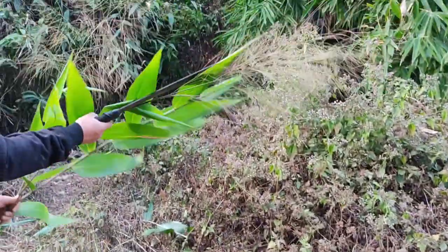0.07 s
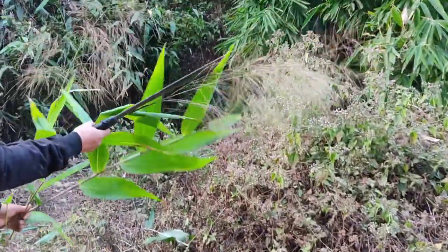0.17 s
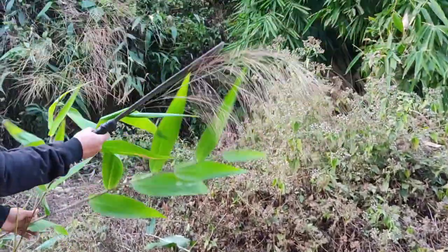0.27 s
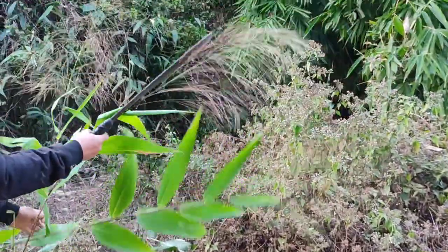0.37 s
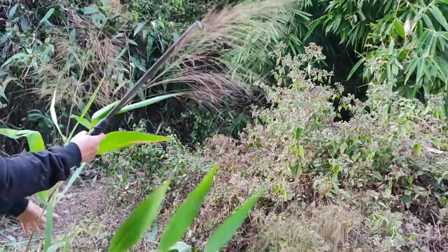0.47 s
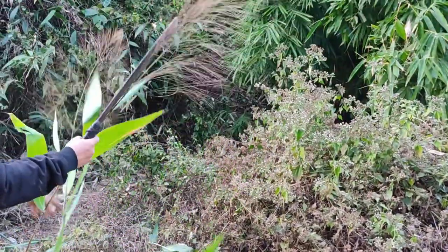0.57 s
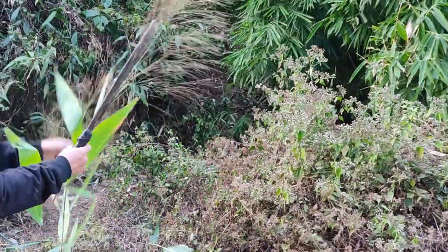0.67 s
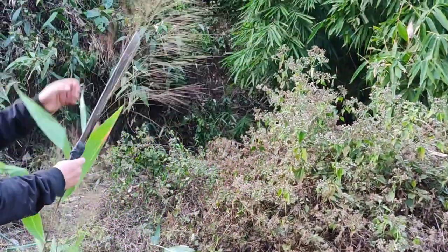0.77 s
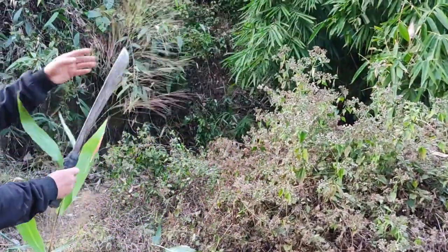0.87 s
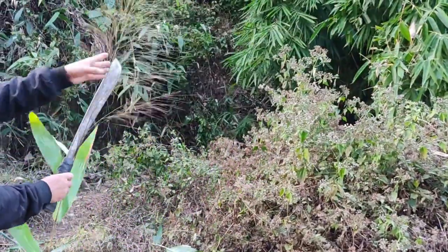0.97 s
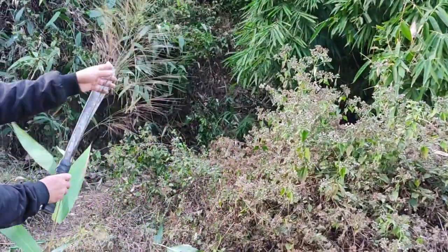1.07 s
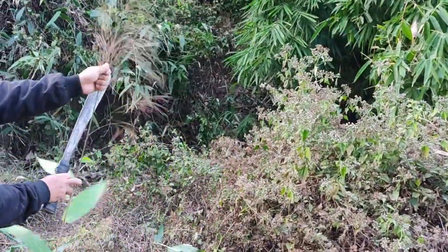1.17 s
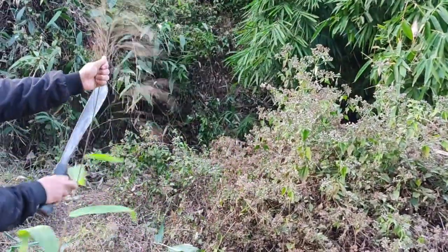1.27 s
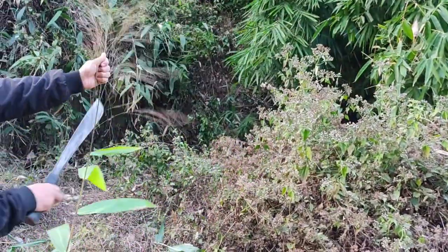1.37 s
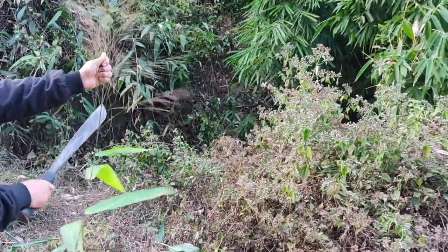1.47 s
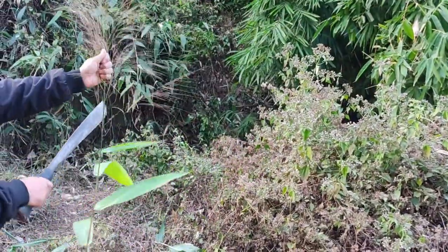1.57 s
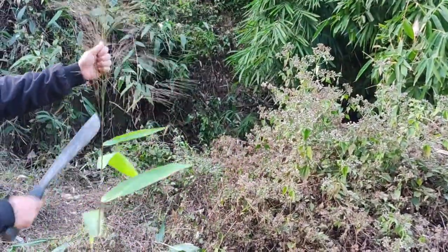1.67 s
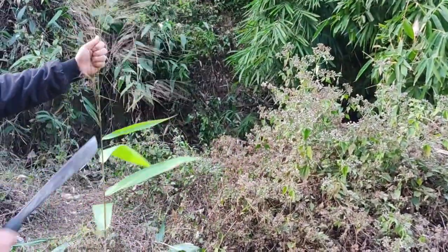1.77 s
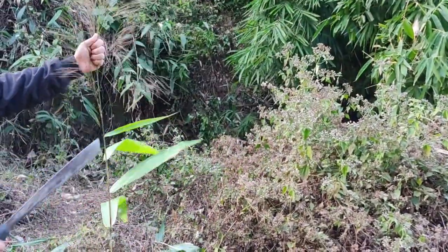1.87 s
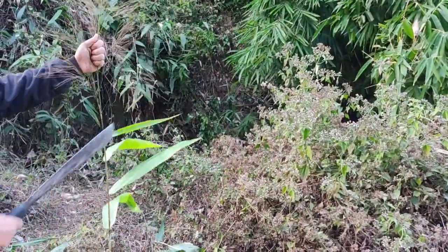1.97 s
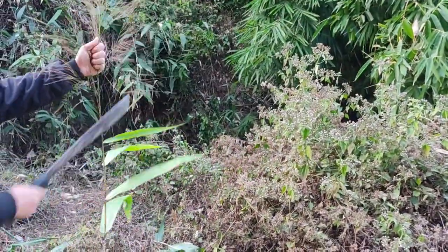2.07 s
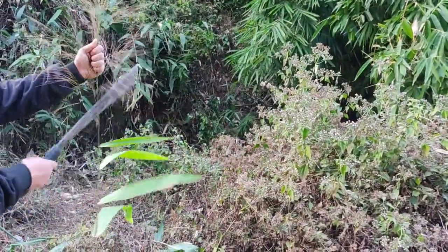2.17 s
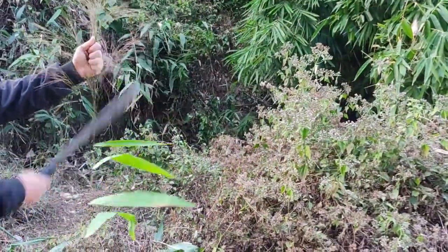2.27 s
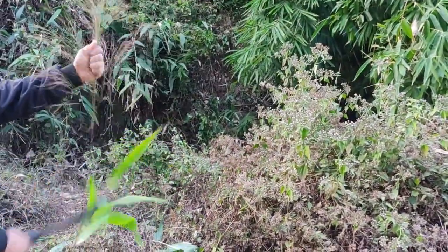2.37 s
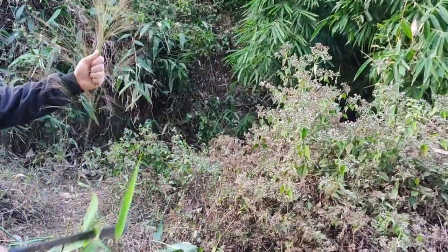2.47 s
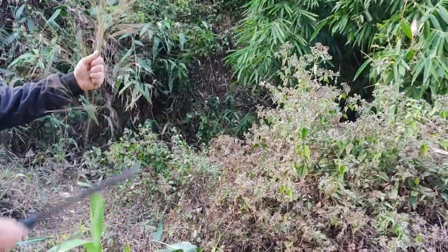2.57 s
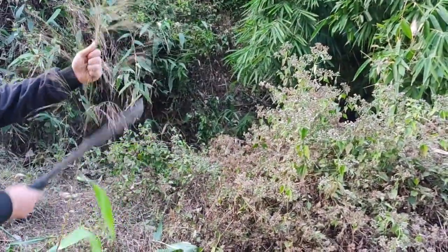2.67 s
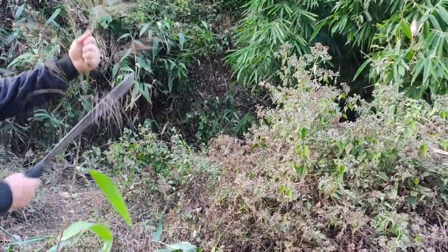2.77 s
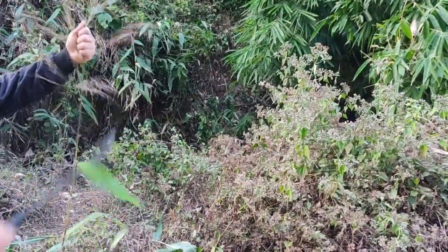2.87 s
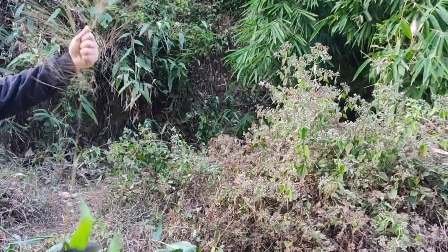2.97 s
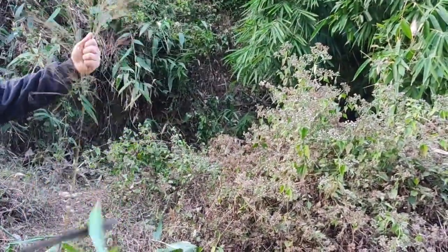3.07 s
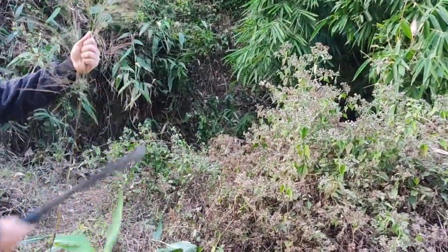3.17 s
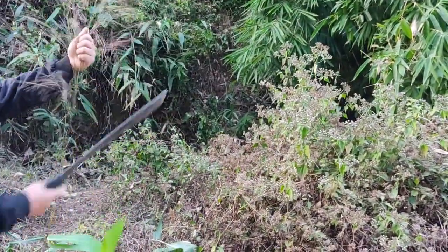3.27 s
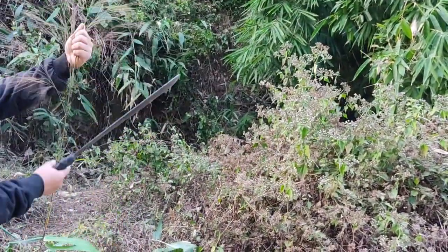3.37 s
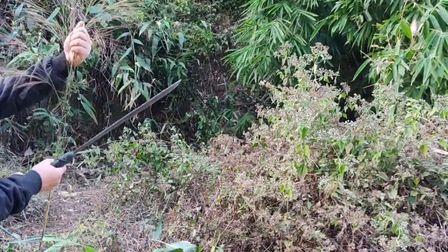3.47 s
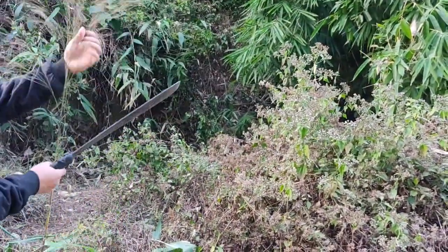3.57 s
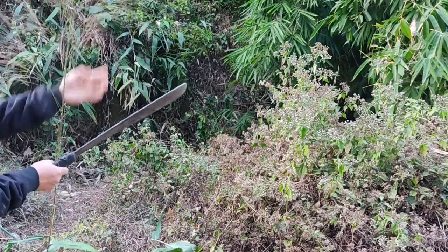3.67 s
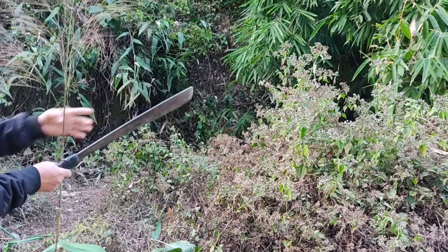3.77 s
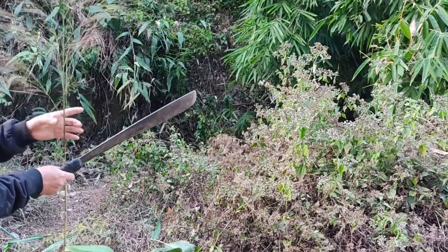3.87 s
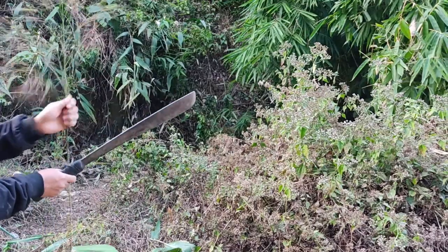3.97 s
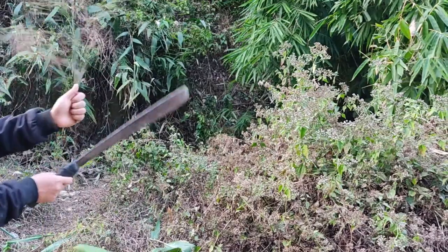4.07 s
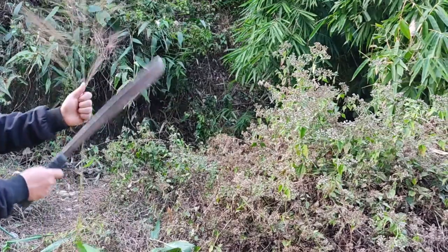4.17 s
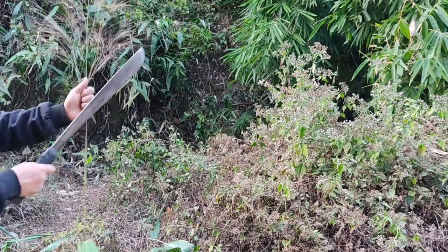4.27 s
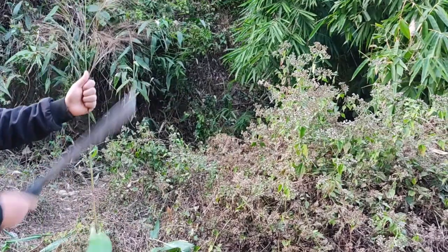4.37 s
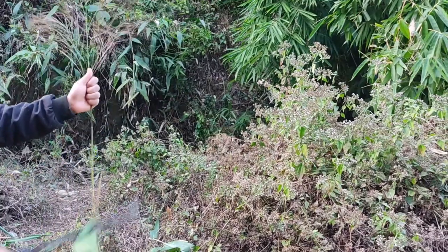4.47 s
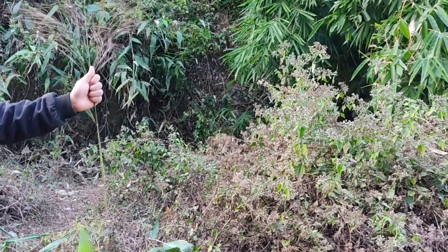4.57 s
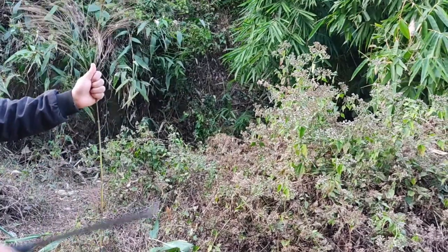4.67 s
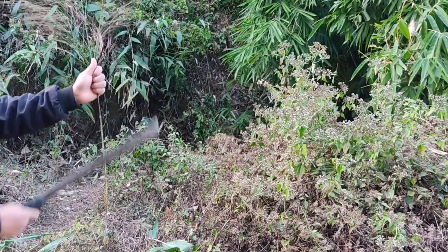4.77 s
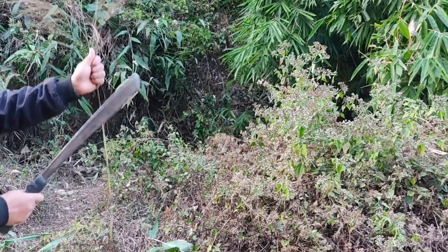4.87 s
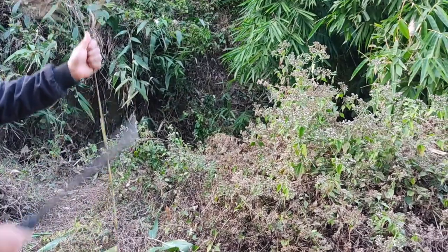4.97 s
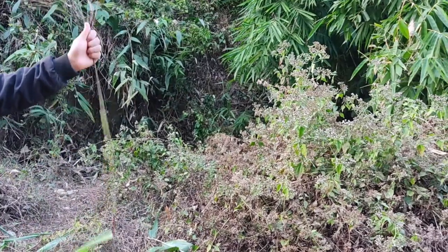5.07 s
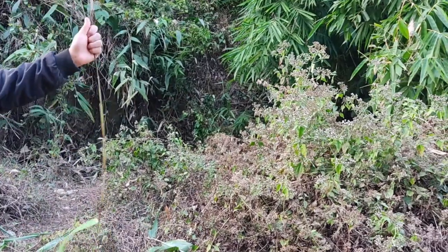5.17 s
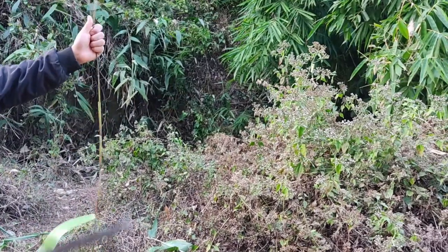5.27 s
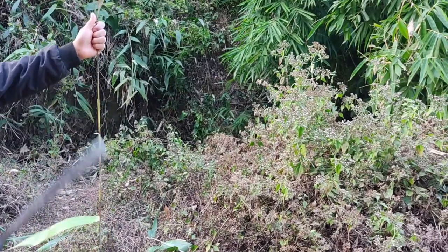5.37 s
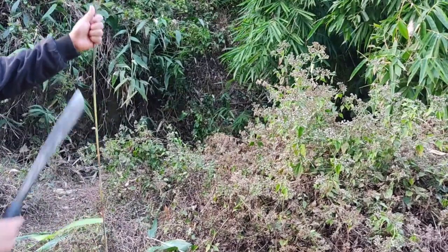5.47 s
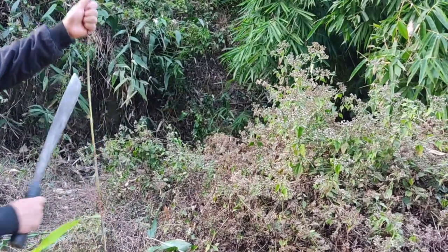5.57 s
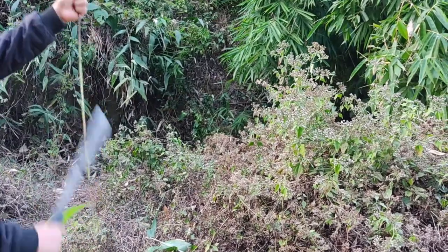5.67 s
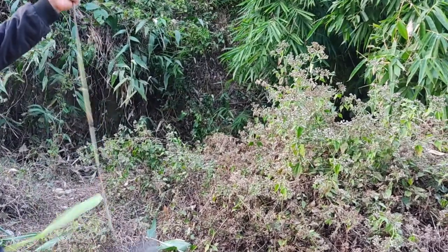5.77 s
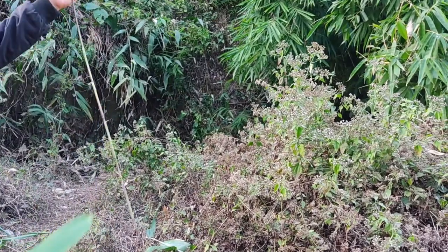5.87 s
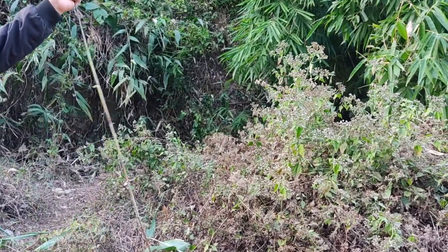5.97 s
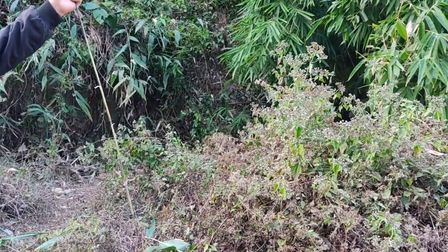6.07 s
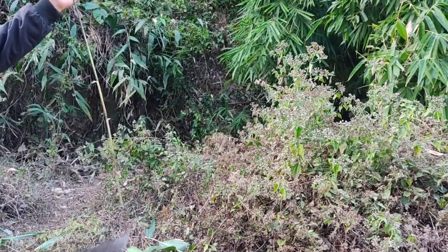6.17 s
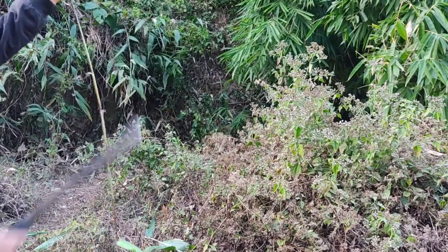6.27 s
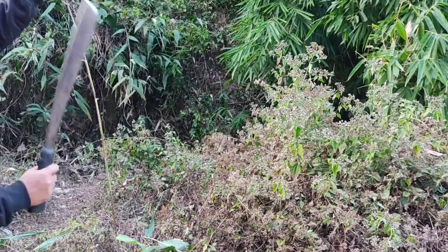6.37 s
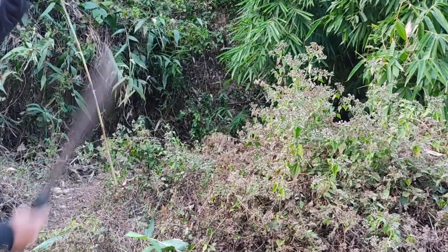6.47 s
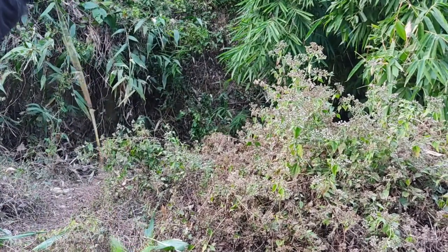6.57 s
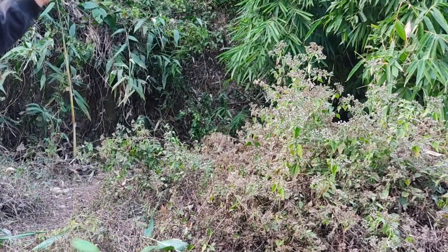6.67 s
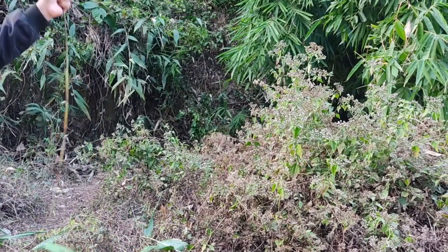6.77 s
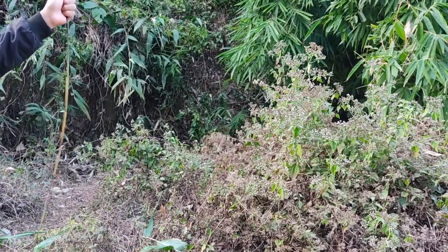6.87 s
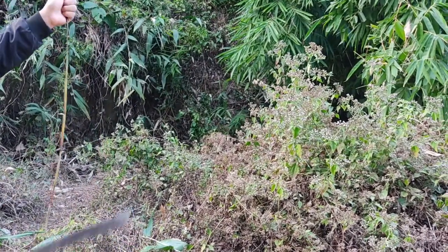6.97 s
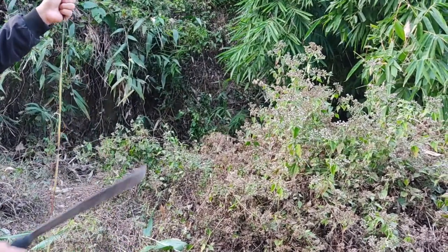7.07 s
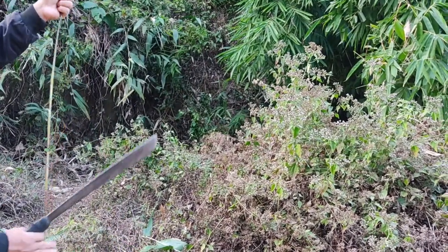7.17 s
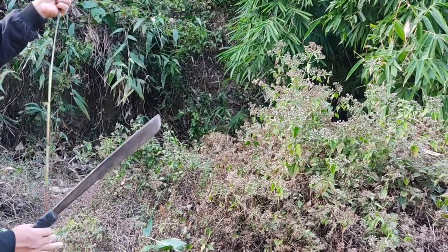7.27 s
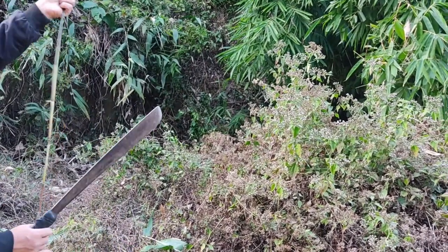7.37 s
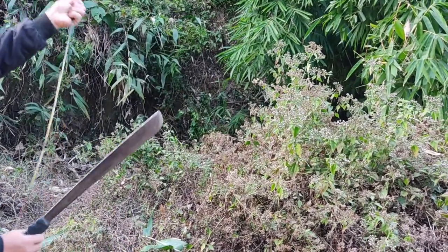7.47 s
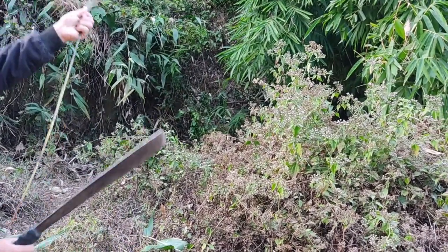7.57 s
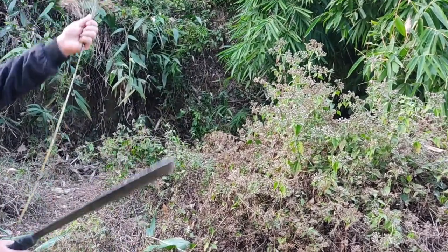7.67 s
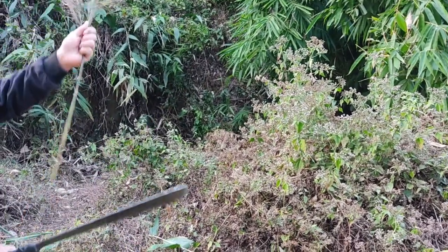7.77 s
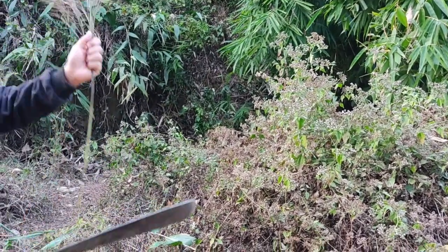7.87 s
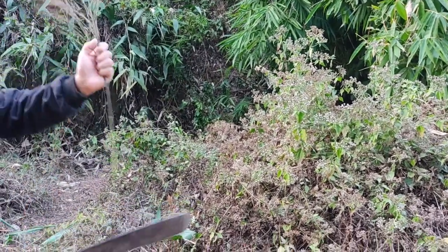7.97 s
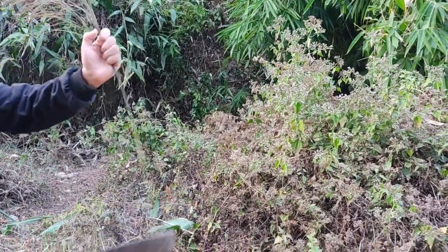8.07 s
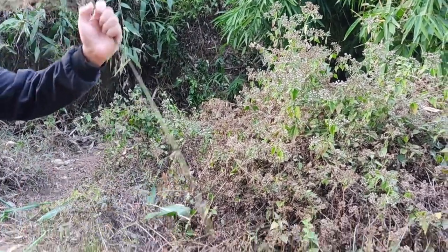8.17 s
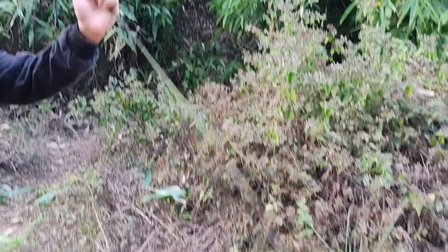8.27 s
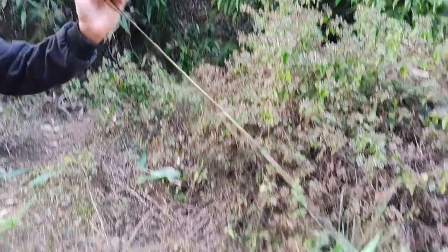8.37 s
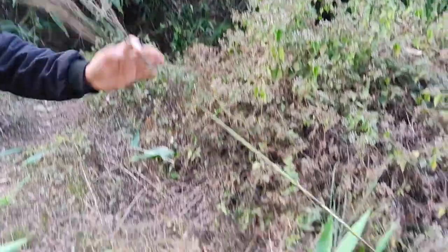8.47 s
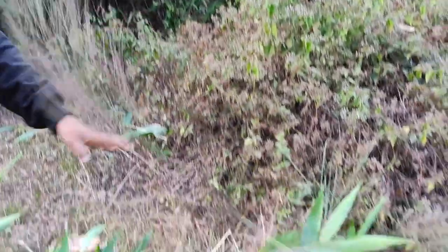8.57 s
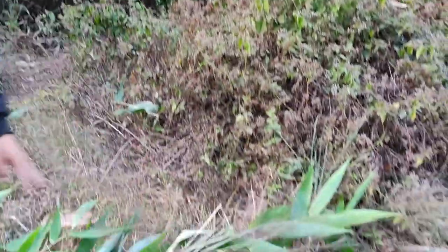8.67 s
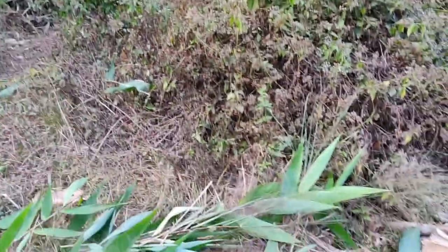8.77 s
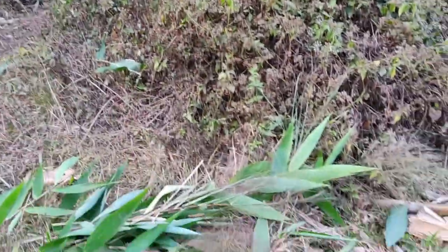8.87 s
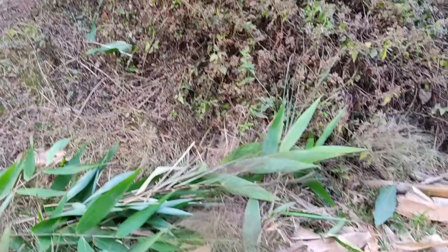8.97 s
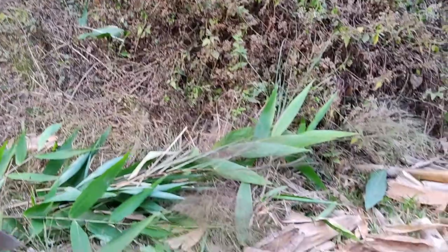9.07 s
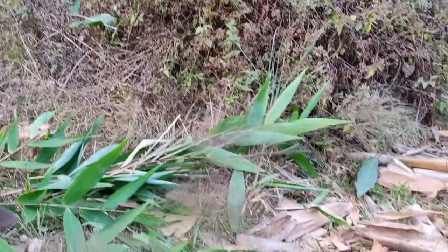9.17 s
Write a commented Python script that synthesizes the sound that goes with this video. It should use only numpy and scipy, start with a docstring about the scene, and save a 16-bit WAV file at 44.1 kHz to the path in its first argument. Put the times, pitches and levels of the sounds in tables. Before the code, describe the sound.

A machete slashes leaves off a cane of tall grass in short, sharp bursts, with leaves rustling and crickets chirping softly behind.

```python
"""A machete strips leaves from a hand-held cane of tall grass at the edge of a wood, close to a phone.
From the start a quiet breeze blows and crickets scrape their wings: one calls in falling pairs, others
trill, and a far chorus drones. Leaves rustle under a few light cuts. From 2.4 s the blade tears along
the cane in short, loud bursts: fibres snap, hollow pieces ring and the leaves shake. After a lull
the phone turns to the heap, and a last burst comes at 8.8 s."""
import sys
import numpy as np
from scipy import signal
from scipy.fft import rfft, irfft, next_fast_len
from scipy.io import wavfile
from scipy.ndimage import uniform_filter1d, map_coordinates

SR = 44100
rng = np.random.default_rng(int(sys.argv[2]) if len(sys.argv) > 2 else 0)


def wrap_up_sound(samples):
    """Save the sound to the file named by the first command line argument, as 16-bit audio."""
    columns = np.atleast_2d(samples).T
    # keep every value between -1 and 1, then stretch to whole-number steps
    tamed = np.clip(columns, -1, 1)
    steps = np.round(tamed * 32767).astype(np.int16)
    wavfile.write(sys.argv[1], SR, steps)


N = 406602
T = np.arange(N) / SR

# The plant has four voices: dry edges, broad leaves, stem and fizz (the finest fibres).
# A share is added to level_db; fade_s is the time to drop 60 dB; a positive pan is to the left.
# Cuts and knocks of the blade: start_s, level_db, leaf_share_db, stem_share_db, fizz_share_db,
# fade_s, ring_hz, ring_share_db, pan_db
CUTS = [(0.0502, -47.5, -11, -9.5, -10, 0.134, 2030, 2.5, 0.5),
        (0.1775, -61, 2, 5.5, -26.5, .032, 2502, 10, 1), (0.2761, -51, -22, -23, -34.5, .06, 2410, 6.5, -1),
        (0.431, -55.5, 6, -13, -19.5, 0.09, 1090, 10.5, 1),
        (1.004, -55, -11, -19.5, -24.5, 0.043, 2400, 4.5, -2),
        (1.022, -54, -11, -8.5, -23.5, 0.0506, 270, 10.5, -3),
        (2.37, -36.5, -9, -29, -31, .027, 2540, 5, -.5), (2.39, -33, -9.5, -21.5, -29, .038, 2170, -3.5, 1),
        (2.4205, -29.5, -15, -15.5, -23.5, 0.0415, 2094, 4.5, 1.5),
        (2.4668, -28, -12, -19.5, -26, 0.036, 2395, 4.5, -2),
        (2.4889, -39.5, -15.5, -10, -30.5, 0.057, 2396, 4, 0),
        (2.552, -45, -17, -39, -34, 0.065, 1810, 6.5, 2),
        (2.6178, -47, -18, -21, -27.5, 0.0975, 354, -18, -2.5),
        (2.878, -47, -5, -19.5, -24.5, 0.13, 2465, 2, -.5),
        (2.921, -50.5, -5.5, -25, -22.5, 0.014, 2300, -5, 1.5),
        (2.931, -48.5, 4, -4, -26.5, 0.0305, 2220, 17, -3),
        (2.95, -33, -5, -12, -19.5, .066, 2360, 10.5, 0.5),
        (3.0075, -38, -21.5, -14.5, -12.5, .035, 1857, 7, -1),
        (3.025, -30, -12, -14.5, -26, .033, 2400, -1, 2), (3.184, -53.5, -9, -41, -21.5, .093, 2010, -2, 0),
        (3.795, -55, -17.5, -26.5, -24.5, 0.115, 287, -19.5, -3.5),
        (4.324, -62, 4, -15, -28.5, 0.043, 973, 10, -3),
        (4.4587, -45.5, 5.5, -6, -27.5, 0.0422, 1922, 13.5, -0.5),
        (4.476, -34.5, -15, -37, -12, .053, 2430, -0.5, 2.5),
        (4.5572, -26, -16.5, -21.5, -32.5, 0.043, 2370, -3, -5.5),
        (4.695, -41.5, -16.5, -26, -26.5, .049, 983, -10, -.5),
        (4.8376, -59.5, -3.5, -9, -40, .04, 249, 3, -3),
        (5.0327, -52, 1.5, -7.5, -12.5, .05, 2086, 19.5, -4),
        (5.05, -42.5, -13, -18.5, -18.5, 0.022, 2300, 4, 1.5),
        (5.082, -32.5, -7, -20.5, -23, 0.03, 1844, 6.5, -.5),
        (5.1262, -34, -2.5, -13, -29, 0.0243, 2130, 6.5, 0),
        (5.2746, -46.5, -3, -4.5, -43.5, 0.0297, 1980, 16.5, -2),
        (5.5864, -62.5, 3.5, -28.5, -23, 0.015, 2613, 21, 1),
        (5.6076, -66, 10.5, -6, -36.5, 0.028, 2290, 4.5, 1),
        (5.7648, -29.5, -5, -20, -33, 0.026, 1850, 6, 2),
        (5.786, -28.5, -17.5, -13.5, -31, 0.0224, 1987, 4, 0),
        (5.802, -49.5, -10, -23.5, -23.5, 0.129, 1910, 12, 2),
        (5.8763, -51, -6.5, -15.5, -25.5, 0.0396, 1840, 0.5, -3.5),
        (6.361, -58, -12.5, -8.5, -16.5, 0.037, 250, -1.5, 0),
        (6.386, -53, -20.5, -37.5, -19, .031, 1010, -8.5, -8),
        (6.4655, -54, -7.5, -13.5, -20, .12, 2450, 2, -3),
        (6.6183, -40, -6, -15, -16, 0.0564, 2300, 10.5, -1.5),
        (6.6485, -45, -17, -20, -22, 0.0214, 894, 2.5, -6.5),
        (6.6653, -32, -7.5, -19.5, -30.5, 0.0364, 2560, -9, 2.5),
        (6.6776, -37.5, -7.5, -17, -22, 0.0205, 1620, 3, -4.5),
        (6.8157, -53, 6, -5.5, -38, 0.096, 908, 13.5, -1), (7.207, -69.5, 5, 4.5, -34, 0.045, 734, 9, 0.5),
        (7.2822, -48.5, -10, -12.5, -12, 0.0765, 776, 8.5, 5.5),
        (7.5812, -63.5, -5.5, -19.5, -22.5, 0.067, 939, 8.5, -3),
        (8.824, -41, -5, -19.5, -21.5, .04, 1120, 12.5, -3.5),
        (8.838, -37, -13, -22, -24.5, 0.097, 944, 7, 6), (8.925, -58, -1, -3, -14.5, .04, 374, 0, 7.5),
        (9.0445, -66, -10.5, 6.5, -27, .031, 563, 26.5, -1.5),
        (9.0588, -61.5, -18.5, 6.5, -26.5, 0.0338, 413.7, 19, 1),
        (9.098, -62, -15.5, 3, -25.5, .12, 600, 14, -4.5)]
# Single fibres snapping: start_s, level_db, leaf_share_db, fizz_share_db, pan_db
SNAPS = [(0.086, -46.5, -11.5, -14.5, 18), (0.1256, -46, -17.5, -16, 2), (0.4733, -46, -13, -14.5, 2),
         (0.5434, -41, -16, -36.5, 5), (0.7869, -43.5, -17.5, -23, -7.5), (0.8123, -46.5, -9.5, -19.5, -1),
         (0.8464, -48, -11.5, -25, -4), (0.8906, -42.5, -22, -16.5, 0), (0.916, -45, -3, -16, -6),
         (1.144, -59, 1, -25.5, -4), (1.243, -51, -12.5, -26, -1), (1.298, -54.5, -9.5, -20.5, -1.5),
         (1.649, -63.5, -3.5, -22.5, -2.5), (1.6716, -54.5, -2.5, -23.5, -3), (1.7232, -55, -2, -31, -2),
         (2.39, -29.5, -12.5, -24, -3.5), (2.5506, -38, -14.5, -26.5, -1), (2.9733, -29.5, -16, -16.5, -5),
         (4.2182, -43.5, -15.5, -34, -6.5), (4.2627, -53.5, -15.5, -28.5, -8),
         (4.5232, -31.5, -11.5, -16, -0.5), (4.6593, -47, -19, -20.5, -1.5), (5.005, -43, -10, -16.5, -2.5),
         (5.0714, -42, -20, -15.5, -3), (5.1532, -45, -11.5, -12, 2), (5.3926, -44.5, -22, -24.5, -2),
         (5.5868, -55.5, -3, -25, -7), (5.657, -62.5, 2.5, -36, -2), (5.7651, -28, -12, -29, 0),
         (5.8003, -37.5, -9, -26, -5.5), (5.8429, -45, -15.5, -12, 3.5), (6.6167, -34.5, -6.5, -14, -2.5),
         (6.68, -30, -9, -23, -5.5), (6.6995, -48.5, -17.5, -25, 2.5), (6.7154, -46.5, -6.5, -27.5, 0.5),
         (6.8034, -30, -18, -39, -8), (8.8442, -46.5, -0.5, -17, 9.5), (8.861, -45, -7, -22, 5)]
SNAP_STEM_DB = -9.5  # the stem compared with the leaf in a snap


def amp(db):
    """Turn decibels into a number to multiply by."""
    return 10 ** (np.asarray(db) / 20)


def unit(x):
    """Scale a signal to an average power of one."""
    return x / np.sqrt(np.mean(x ** 2) + 1e-20)


def along(points, hz):
    """Read between (frequency, value) points on a log frequency scale."""
    point_hz, values = np.transpose(points)
    return np.interp(np.log(hz + 1), np.log(point_hz + 1), values)


def curves(rows):
    """Join timed rows with straight lines: one curve for each column after the time."""
    times, *columns = np.transpose(rows)
    return [np.interp(T, times, column) for column in columns]


def wobble(rate_hz):
    """A smooth curve through rate_hz random points a second."""
    return map_coordinates(rng.standard_normal(int(N * rate_hz / SR) + 4), [T * rate_hz])


def filtered(x, response):
    """Scale each frequency of x by response(hz)."""
    size = next_fast_len(N + 8192)
    return irfft(rfft(x, size) * response(np.fft.rfftfreq(size, 1 / SR)), size)[..., :N]


def at_microphones(pair, colour, likeness):
    """Shape the tone of two signals and mix them to left and right; likeness 1 uses only the first."""
    # The balance between the two microphone openings: frequency_hz, pan_db
    balance = [(60, 5.5), (130, 4.5), (400, 5.5), (1040, 2.5), (1850, -3), (2700, -2.5), (4790, 2.5),
               (5790, 1.5), (7000, -7.5), (8470, 7), (10200, 4), (15000, -1.5)]
    size = next_fast_len(N + 8192)
    hz = np.fft.rfftfreq(size, 1 / SR)
    angle = np.arccos(np.clip(along(likeness, hz), -1, 1)) / 2
    gain = unit(amp(along(colour, hz)))
    mid, side = rfft(pair, size) * gain * [np.cos(angle), np.sin(angle)]
    pan = amp(np.outer([.5, -.5], along(balance, hz)))
    return irfft([mid + side, mid - side] * pan, size)[:, :N]


def breeze():
    """The quiet hiss and rumble of the wood, almost unrelated on the two sides."""
    # The tone of the moving air: frequency_hz, relative_db
    air_colour = [(12, -10), (20, 4.5), (30, -6), (100, -16), (130, -13), (380, -17.5), (800, -28),
                  (1500, -30), (2400, -28), (4000, -28.5), (7300, -19), (9000, -30.5), (10300, -52.5),
                  (15800, -52.5), (16000, -66)]
    air = at_microphones(rng.standard_normal((2, N)), air_colour, likeness=[(100, 0.035)])
    return amp(-68 + wobble(3.09)) * air


def far_chorus():
    """Many distant crickets blur into throbbing noise around the pitches of their wings."""
    # Level of the high ringing drone: time_s, level_db
    drone_levels = [(0, -69), (1.0, -64.5), (1.3, -69.5), (2.3, -65.5), (3.0, -63.5), (3.5, -70),
                    (4.5, -63.5), (5.7, -69.5), (6.6, -66), (7.8, -72), (8.4, -66.5), (9.22, -70)]
    # Where the wings ring: pitch_hz, half_width_hz, relative_db
    wings = [(5408, 90, -8.5), (5740, 740, -6.5), (6057, 430, -5)]

    def ringing(hz):
        return sum(amp(db) / (1 + ((hz - pitch) / width) ** 2) for pitch, width, db in wings)

    throb = amp(2.4 * np.sin(2 * np.pi * 18.0 * T + 2 * wobble(2)))
    drone = filtered(rng.standard_normal((2, N)), ringing)
    return unit(drone * throb) * amp(curves(drone_levels)[0])


def wing_strokes(middles_s, pitch_hz, fall_hz, length_s, level_db, uneven):
    """One wing scrapes a row of teeth on the other; the pitch falls ever faster as the row runs out."""
    out = np.zeros(N + SR)
    progress = np.arange(round(length_s * SR)) / (length_s * SR)
    shape = np.sin(np.pi * progress ** 1.035) ** 1.266
    levels_db = np.broadcast_to(level_db, len(middles_s))
    nudges = uneven * rng.standard_normal((len(middles_s), 3))  # no two strokes are quite alike
    for middle_s, db, (pitch_nudge, time_nudge, level_nudge) in zip(middles_s, levels_db, nudges):
        hz = pitch_hz + 20 * pitch_nudge + fall_hz * (.45 - progress ** 1.298)
        phase = 2 * np.pi * (np.cumsum(hz) / SR + rng.uniform())
        start = max(round((middle_s + .0015 * time_nudge - length_s / 2) * SR), 0)
        out[start:][:len(shape)] += amp(db + 1.3 * level_nudge) * shape * np.sin(phase)
    return out[:N]


def steady_cricket():
    """One lower cricket, nearer than the chorus, scrapes without a pause."""
    # Level of this pulsing tone: time_s, level_db
    song_levels = [(0, -69), (1.5, -74), (2.6, -68), (3.3, -74), (4.5, -69.5), (5.3, -76), (5.8, -68),
                   (6.9, -70.5), (7.4, -66), (8.1, -65), (8.3, -73), (9.22, -70)]
    times = np.arange(.04, T[-1], 1 / 19.3)
    song = wing_strokes(times, pitch_hz=5370, fall_hz=70, length_s=.046, level_db=0, uneven=1.1)
    return amp(curves(song_levels)[0]) * song


def trilling_crickets():
    """Fast runs of wing strokes make long phrases, with softer, shorter ones between."""
    # Phrases: first_s, last_s, strokes_per_s, pitch_hz, fall_hz, first_db, last_db
    phrases = [(0.014, 1.191, 20.4, 5773, 219, -57, -68.5), (1.42, 1.67, 18.7, 5636, 100, -73, -75),
               (1.713, 3.144, 19.16, 5812, 300, -62, -64.5), (3.356, 3.756, 18, 5650, 100, -72.5, -71),
               (3.862, 5.229, 19.6, 5791, 304, -63, -66), (5.42, 5.925, 23, 5648, 100, -73.5, -67.5),
               (6.046, 7.413, 20.5, 5797, 325, -64, -63.5), (7.488, 8.205, 20.8, 5590, 100.4, -72.5, -70),
               (8.235, 9.01, 20.1, 5828, 300, -65, -60.5)]
    out = np.zeros(N)
    for first_s, last_s, rate, pitch_hz, fall_hz, first_db, last_db in phrases:
        times = np.linspace(first_s, last_s, round((last_s - first_s) * rate) + 1)
        levels_db = np.interp(times, [first_s, last_s], [first_db, last_db])
        out += wing_strokes(times, pitch_hz, fall_hz, length_s=.036, level_db=levels_db, uneven=.8)
    return out


def calling_cricket():
    """A near cricket calls with two quick, falling wing strokes at a time."""
    # The first stroke of each pair: middle_s
    calls = [.144, .428, .677, 0.929, 1.483, 1.731, 1.985, 2.234, 2.497, 2.782, 3.035, 3.284, 3.534, 3.798,
             4.093, 4.348, 4.612, 4.864, 5.415, 5.661, 5.915, 6.171, 6.438, 6.695, 6.969, 7.239, 7.884,
             8.127, 8.377, 8.636]
    times = np.concatenate([calls, np.add(calls, 0.04434)])
    return wing_strokes(times, pitch_hz=4780, fall_hz=880, length_s=0.029, level_db=-54.5, uneven=.6)


def tree_echo(sound, fade_s=0.13):
    """Trees scatter a sound into a short tail, different on each side."""
    t = np.arange(SR // 5) / SR
    tail = rng.standard_normal((2, len(t))) * amp(-60 * t / fade_s)
    return signal.fftconvolve(sound[None], tail / np.linalg.norm(tail[0]), axes=1)[:, :N]


def crickets():
    """The nearer crickets, placed by level and tiny delays, with their echo and the far chorus."""
    caller, trill, steady = calling_cricket(), trilling_crickets(), steady_cricket()
    left = np.roll(caller, -2) * amp(-1.0) + trill + steady
    right = caller * amp(-2.5) + trill * amp(.5) - np.roll(steady, 2)
    scattered = amp(-10.5) * caller + amp(-1) * trill + amp(-2.0) * steady
    return np.array([left, right]) + far_chorus() + tree_echo(scattered)


def crackle(grains_per_s, spread_db, patchy_db):
    """Two streams of tiny cracks of uneven size; each leaf is briefly bright in its own pitch range."""
    spectrum = signal.stft(rng.standard_normal((2, N), np.float32), nperseg=256)[2]
    patches = uniform_filter1d(rng.standard_normal(spectrum.shape[1:]), size=4, axis=0)
    patches = uniform_filter1d(patches, size=5, axis=1)
    noise = signal.istft(spectrum * amp(patchy_db * unit(patches)), nperseg=256)[1][:, :N]
    sizes = amp(spread_db * np.minimum(rng.exponential(size=int(N * grains_per_s / SR) + 2), 3))
    return unit(sizes[(T * grains_per_s).astype(int)] * noise)


def rustle():
    """Leaves flutter between strokes: the strength of each plant voice, on each side, over time."""
    # Moving leaves: time_s, level_db, leaf_share_db, stem_level_db
    movement = [(0.0, -50, -5.5, -73), (0.13, -48, -11.5, -67), (0.33, -52.5, -8.5, -71.5),
                (0.5, -55.5, -14.5, -76), (0.66, -60, -8, -77), (0.8, -61, -14.5, -82.5),
                (0.97, -49.5, -6.5, -70), (1.1, -51.5, -8, -73), (1.41, -71, -9.5, -80.5),
                (1.67, -72.5, -5, -80), (1.87, -61.5, -8.5, -80.5), (2.2, -76, -1, -80.5),
                (2.6, -64, -14, -78.5), (2.72, -77.5, -11, -84), (2.87, -61, -14.5, -86),
                (3.14, -72, -12, -77), (3.2, -63, -8, -78), (3.54, -75, -5.5, -74),
                (3.77, -89.5, -17.5, -98.5), (4.01, -63.5, -17, -82), (4.16, -58.5, -8, -77.5),
                (4.3, -72, -9.5, -83.5), (4.5, -72, -9, -82), (4.64, -59, -13, -78), (4.76, -71, -10, -81),
                (4.93, -67.5, -8, -77.5), (5.1, -59, -5.5, -73), (5.57, -81, -14, -91.5),
                (5.85, -68.5, -9, -82.5), (6.33, -79, -8.5, -80.5), (6.38, -57.5, -9.5, -81.5),
                (6.5, -60.5, -8.5, -79), (6.6, -67.5, -8.5, -82.5), (7.11, -71, -4.5, -75),
                (7.9, -90.5, -10.5, -89.5), (8.27, -69, -2.5, -78), (8.42, -63.5, -6.5, -74),
                (8.75, -75, -7, -78.5), (8.92, -56, -8.5, -74), (9.0, -58, -9, -71),
                (9.22, -54, -9.5, -67.5)]
    dry_db, leaf_share_db, stem_db = curves(movement)
    levels_db = np.array([dry_db, dry_db + leaf_share_db, stem_db, dry_db - 23.5])
    flutter_db = 2.1 * np.array([wobble(30), wobble(20), wobble(14), wobble(30)])
    strength = amp(levels_db + flutter_db)
    return np.stack([strength, strength], axis=1)


def add_burst(strength, start_s, levels_db, pan_db, shape):
    """Add one rise and fall in strength to all four voices on both sides."""
    gain = amp(np.add.outer(levels_db, [pan_db / 2, -pan_db / 2]))
    span = strength[..., round(start_s * SR):][..., :len(shape)]
    span += gain[..., None] * shape[:span.shape[-1]]


def fibre_snaps(click_db=17.5, fray_fade_s=0.01286):
    """A fibre parts with a click, then frays: gives the strength of the fraying, and the clicks."""
    fraying, clicks = np.zeros((4, 2, N)), np.zeros((4, N))
    t = np.arange(SR // 8) / SR
    for start_s, db, leaf_db, fizz_db, pan_db in SNAPS:
        levels_db = db + np.array([0, leaf_db, leaf_db + SNAP_STEM_DB, fizz_db])
        add_burst(fraying, start_s, levels_db, pan_db, amp(-60 * t / fray_fade_s))
        clicks[:, round(start_s * SR)] = amp(levels_db + click_db) * rng.choice([-1, 1])
    return fraying, clicks


def hollow_cane():
    """Each cut rings the hollow piece it frees, at a pitch set by its length; high rings die fast."""
    out, t = np.zeros(N + SR), np.arange(SR // 10) / SR
    for start_s, db, *_, ring_hz, ring_db, _ in CUTS:
        fade_s = 0.0078 + 15 / ring_hz
        shape = (1 - np.exp(-t / 0.00172)) * amp(-60 * t / fade_s)
        out[round(start_s * SR):][:len(t)] += amp(db + ring_db) * shape * np.sin(2 * np.pi * ring_hz * t)
    return at_microphones(np.array([out[:N], np.zeros(N)]), colour=[(100, 0)], likeness=[(100, 1)])


def blade_cuts(tear_s=0.00503):
    """The blade strikes: each voice jumps in strength, holds while the cut tears, then dies away."""
    strength, t = np.zeros((4, 2, N)), np.arange(SR // 8) / SR
    for start_s, db, leaf_db, stem_db, fizz_db, fade_s, _, _, pan_db in CUTS:
        shape = (1 - np.exp(-t / 0.000369)) * amp(-60 * np.maximum(t - tear_s, 0) / fade_s)
        add_burst(strength, start_s, db + np.array([0, leaf_db, stem_db, fizz_db]), pan_db, shape)
    return strength


def blade_slashes(swell_db=22, shake_fade_s=0.309):
    """The blade tears along the cane: each voice swells and fades, and the struck leaves shake on."""
    # Tears: start_s, rise_s, hold_s, fade_s, level_db, leaf_share_db, stem_share_db, fizz_share_db
    slashes = [(0.804, 0.0481, 0.0828, 0.112, -42, -4, -16, -24),
               (2.384, 0.0064, 0.0816, 0.311, -42.5, -4.5, -17.5, -21),
               (2.455, 0.0143, .001, 0.0916, -28, -10.5, -31.5, -22.5),
               (2.945, 0.0359, 0.051, 0.2544, -36, -9, -22, -21),
               (4.468, 0.0117, 0.0454, .05, -35.5, -11, -28.5, -11),
               (4.553, 0.01214, .001, 0.0433, -25.5, -7.5, -18, -23),
               (5.018, 0.0512, 0.029, .1, -59.5, 3, -7, -3.5),
               (5.105, 0.0243, 0.00097, 0.0815, -43, -3.5, -14.5, -21.5),
               (5.778, 0.0095, .001, 0.0614, -38, -3, -25, -18.5),
               (6.359, 0.0342, .001, 0.029, -50.5, -17, -34.5, -15.5),
               (6.612, 0.0094, 0.0582, 0.236, -48, -6.5, -17, -15),
               (8.821, 0.0187, 0.00094, 0.1225, -33.5, -10.5, -18.5, -21),
               (9.051, 0.0504, 0.078, 0.185, -55, -16, -10, -22.5)]
    shake_db = [-18.5, -21.5, -21.5, -27.5]  # compared with the tear: dry, leaf, stem, fizz
    strength, t = np.zeros((4, 2, N)), np.arange(SR // 3) / SR
    for start_s, rise_s, hold_s, fade_s, db, leaf_db, stem_db, fizz_db in slashes:
        after_s = np.maximum(t - rise_s - hold_s, 0)
        swell = amp(swell_db * np.minimum(t / rise_s - 1, 0))
        levels_db = db + np.array([0, leaf_db, stem_db, fizz_db])
        add_burst(strength, start_s, levels_db, 0, swell * amp(-60 * after_s / fade_s))
        add_burst(strength, start_s, levels_db + shake_db, 0, swell * amp(-60 * after_s / shake_fade_s))
    return strength


def stripped_cane():
    """Rustles, slashes, cuts and snaps set how loud each voice is; thin and thick parts crackle apart."""
    # The tone of each voice: frequency_hz, relative_db
    dry_colour = [(3000, -44), (4500, -13.5), (6000, -8.5), (7400, 0), (8900, -7), (10300, -31),
                  (11500, -48)]  # the hump near 7 kHz comes from the microphone opening
    leaf_colour = [(700, -26), (1200, -8.5), (1620, -8.5), (2350, -3), (3300, -3.5), (4500, -7.5),
                   (6000, -46)]
    stem_colour = [(60, -20), (110, -20.5), (170, -2.5), (390, 0.5), (600, -4), (820, 2), (1100, -3),
                   (1800, -26.5)]
    fizz_colour = [(9000, -30.5), (10300, 1.5), (12500, 2.5), (15500, -10.5), (15900, -7), (16000, -31),
                   (16500, -44)]
    # How alike left and right are for near sounds: frequency_hz, likeness (0 to 1)
    likeness = [(60, 0.57), (300, 0.964), (1500, 0.534), (5000, 0.396), (9000, 0.24), (15000, 0.31)]
    # How much later the left side hears; the phone turns to the heap at the end: time_s, delay_samples
    left_delay = [(0, 5), (6.8, 5), (7.2, 8), (8.4, 9), (8.75, -10), (9.22, -12)]
    thin, thick = crackle(1200, spread_db=3.5, patchy_db=2), crackle(700, spread_db=2.5, patchy_db=2.5)
    smooth = rng.standard_normal((2, N))  # the stem is too heavy to crackle
    voices = [(dry_colour, thin), (leaf_colour, thick), (stem_colour, smooth), (fizz_colour, thin)]
    strengths = rustle() + blade_slashes() + blade_cuts()
    fraying, clicks = fibre_snaps()
    out = hollow_cane()
    for (colour, noise), strength, click in zip(voices, strengths + fraying, clicks):
        average = strength.mean(0)
        pan = strength / average
        out += at_microphones(average * noise + click * [[1], [.3]], colour, likeness) * pan
    delay = np.round(curves(left_delay)[0]).astype(int)
    delayed = np.clip(np.arange(N) - delay, 0, N - 1)
    return np.array([out[0, delayed], out[1]])


def scene():
    """The machete work in front of the crickets and the breeze."""
    return stripped_cane() + crickets() + breeze()


def record(dry, top_hz=16450):
    """The phone keeps nothing above its highest frequency."""
    return filtered(dry, lambda hz: hz < top_hz)


dry = scene()
out = record(dry)
wrap_up_sound(out)
```